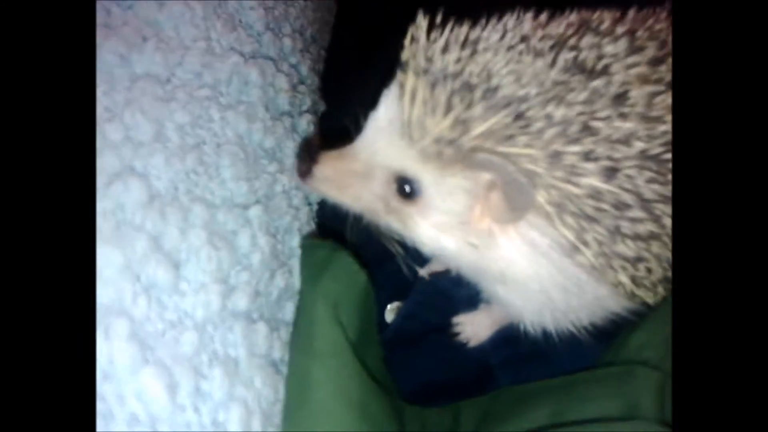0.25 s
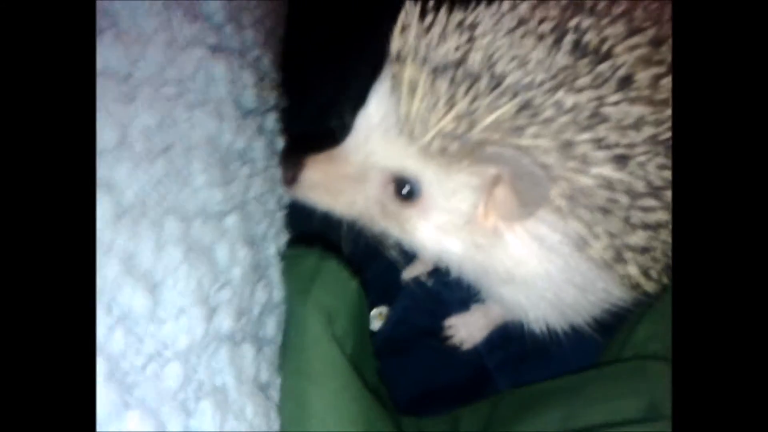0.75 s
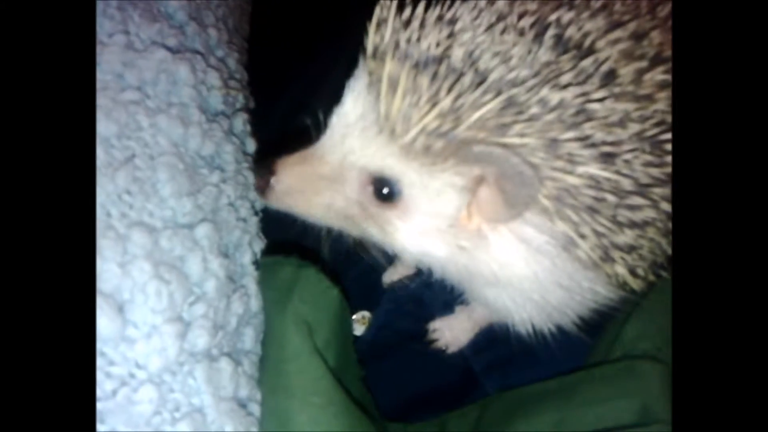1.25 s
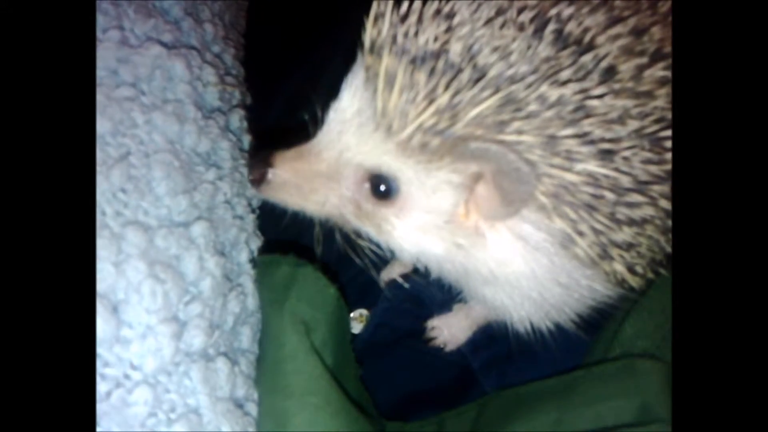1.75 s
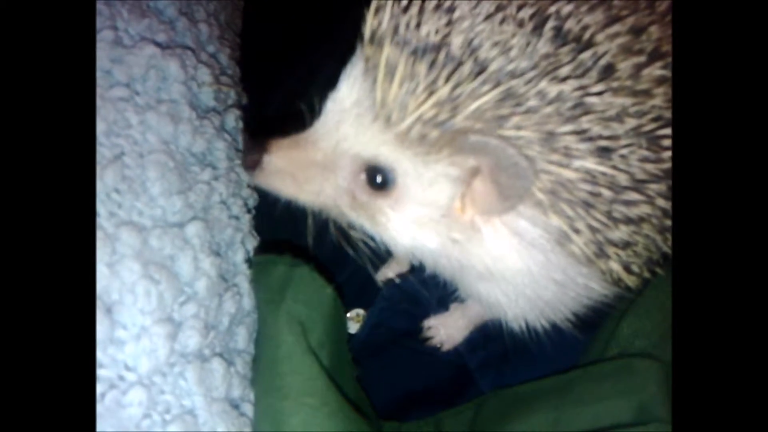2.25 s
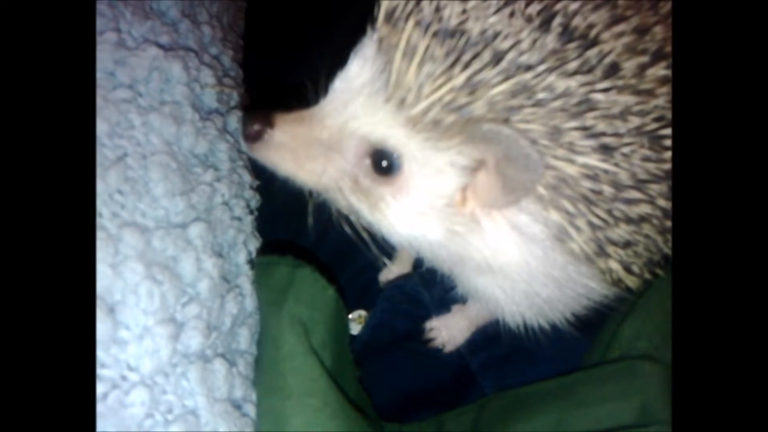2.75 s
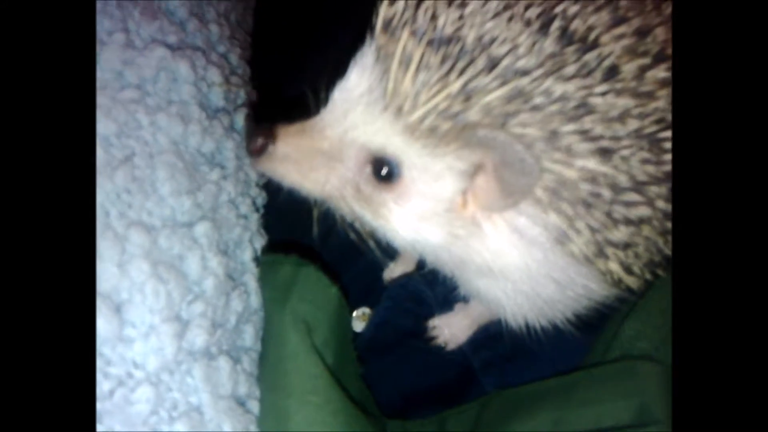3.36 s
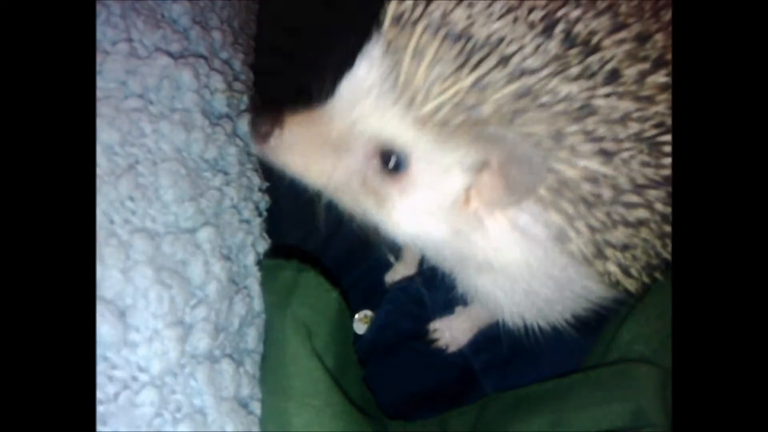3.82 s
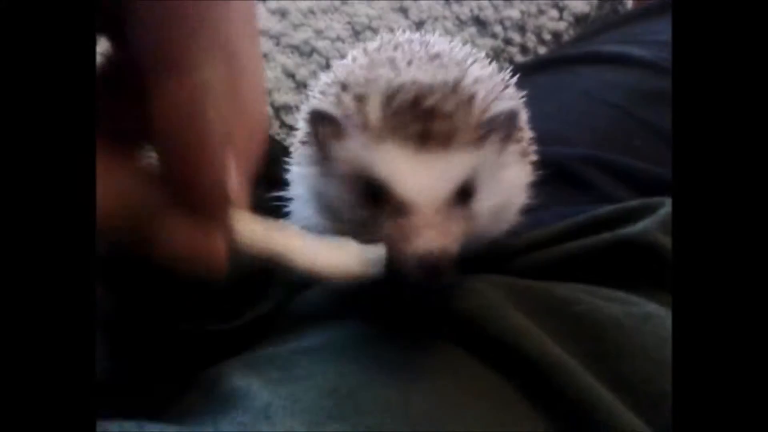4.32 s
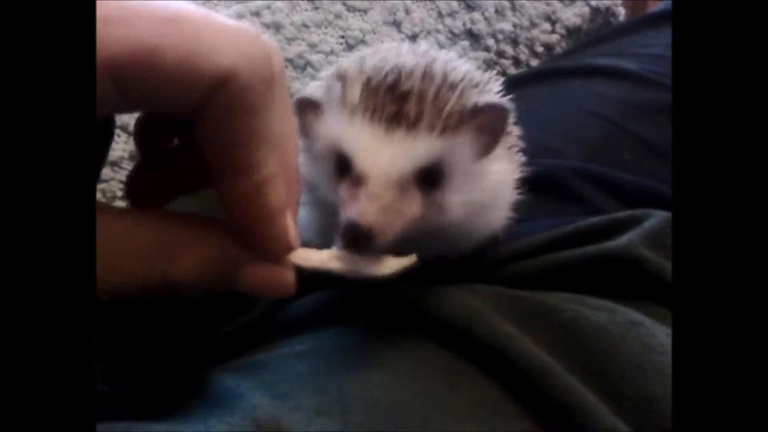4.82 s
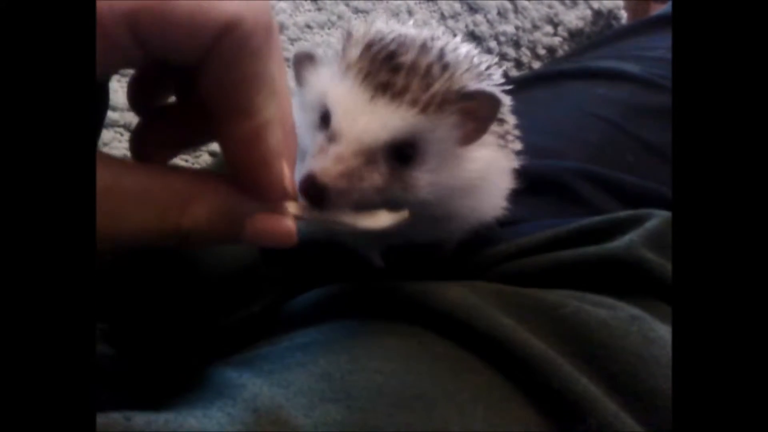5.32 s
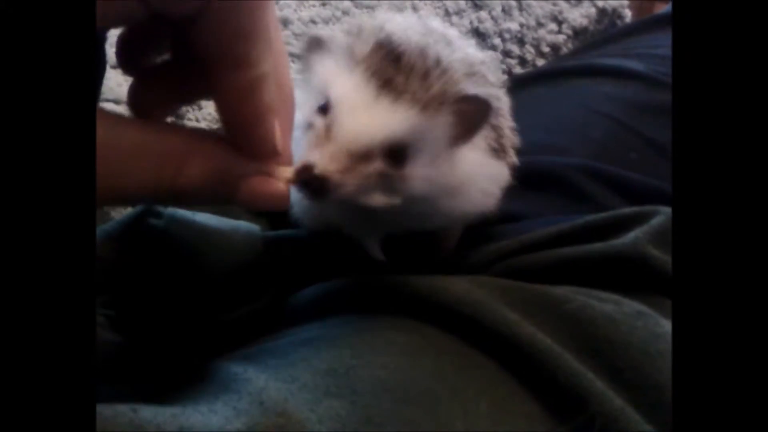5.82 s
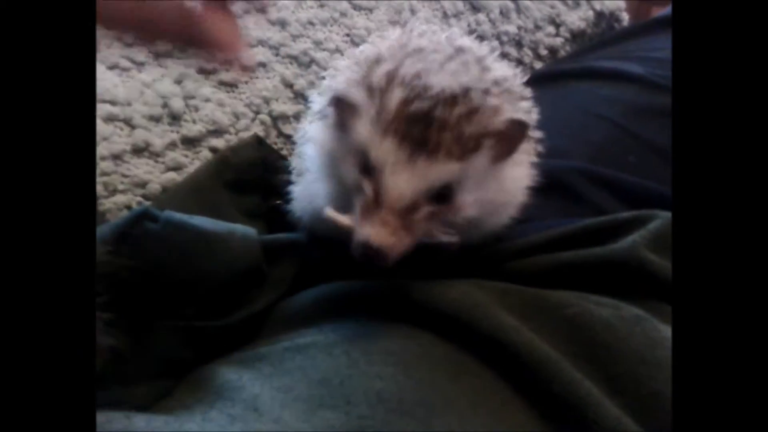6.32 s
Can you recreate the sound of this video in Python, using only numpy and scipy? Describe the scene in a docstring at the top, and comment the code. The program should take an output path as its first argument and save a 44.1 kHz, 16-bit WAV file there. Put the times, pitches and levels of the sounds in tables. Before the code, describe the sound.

In a quiet room, a hedgehog noses into soft fleece: a gentle rustle fades while sharp dry clicks cluster, space out and die away. After a near lull and a bump on the microphone, the sound moves abruptly closer. Quick airy sniffs and tiny wet mouth ticks follow, with another thump and low handling rumble. Steady hiss and two thin, very high whines lie beneath, rising slightly in the close part.

```python
"""Fleece rustles first, as a hedgehog on a lap noses into it; a run of dry clicks slows and fades.
Something bumps the recorder. Then, closer, the animal sniffs at a treat in quick puffs with tiny wet ticks.
A quiet room, recorder hiss and two thin electronic whines lie under it all.
Rustle, hiss, puffs and ticks are shaped noise; clicks are ringing modes; bumps and whines are built on sines."""
import sys
import numpy as np
from scipy import signal
from scipy.fft import rfft, irfft
from scipy.io import wavfile
from scipy.ndimage import uniform_filter1d

SR = 44100
rng = np.random.default_rng(int(sys.argv[2]) if len(sys.argv) > 2 else 0)


def put_to_file(sound):
    """Save the sound as 16-bit audio at rate SR, in the file named by the first command-line argument."""
    columns = np.atleast_2d(sound).T  # one column per channel
    safe = np.clip(columns, -1, 1)
    whole_steps = np.round(safe * 32767)
    wavfile.write(sys.argv[1], SR, whole_steps.astype(np.int16))


N = 290178  # length of the scene [samples]


def amp(db):
    """Turn decibels into a gain."""
    return 10 ** (np.asarray(db, float) / 20)


def rms_one(x):
    """Scale a sound so that its average strength (rms) is 1."""
    return x / np.sqrt(np.mean(x ** 2) + 1e-20)


def in_time(rows):
    """Draw each column of (time [s], ..) rows as a line with one value per sample."""
    times, *columns = np.transpose(rows)
    return [np.interp(np.arange(N) / SR, times, column) for column in columns]


def drift(rate_hz):
    """Slow random wandering of rms 1, made by smoothing noise twice."""
    # computed on every 40th sample, then joined by straight lines
    r = np.exp(-80 * np.pi * rate_hz / SR)
    white = rng.standard_normal(N // 40 + 2002)
    slow = signal.lfilter([1], [1, -2 * r, r * r], white)[2000:]
    return np.interp(np.arange(N) / 40, np.arange(len(slow)), rms_one(slow))


NOISE_EDGE_HZ = 15560  # coloured noise stops here


def colour(x, spectrum):
    """Shape noise by (frequency [Hz], level [dB]) rows, up to the noise edge."""
    hz, db = np.transpose(spectrum)
    grid = np.maximum(np.arange(N // 2 + 1) * SR / N, 1)
    gain = amp(np.interp(np.log(grid), np.log(hz), db))
    return irfft(rfft(x) * gain * (grid < NOISE_EDGE_HZ), N)


def resonate(x, peaks):
    """Send a sound through side-by-side resonances whose signs alternate."""
    out = 0
    for k, (hz, width, db) in enumerate(peaks):
        r = np.exp(-np.pi * width / SR)
        top = [(1 - r * r) / 2, 0, (r * r - 1) / 2]
        bottom = [1, -2 * r * np.cos(2 * np.pi * hz / SR), r * r]
        out = out + (-1) ** k * amp(db) * signal.lfilter(top, bottom, x + 1e-18)
    return out


def ring(strikes, hz, t60):
    """Each unit strike starts a sine that dies away by 60 dB in t60 seconds."""
    r, w = amp(-60 / (t60 * SR)), 2 * np.pi * hz / SR
    return signal.lfilter([0, np.sin(w)], [1, -2 * r * np.cos(w), r * r], strikes + 1e-18)


PORT_TURN_HZ = 4670  # above this the right port hears the wave upside down


def ports(left, low_db, high_db):
    """A near source on the left reaches the right port at other levels, its treble upside down."""
    low = signal.lfilter(*signal.butter(2, PORT_TURN_HZ, fs=SR), left)
    high = signal.lfilter(*signal.butter(2, PORT_TURN_HZ, "high", fs=SR), left)
    return np.array([left, amp(low_db) * low - amp(high_db) * high])


def wide(mid_spectrum, side_spectrum, side_db, lean, white):
    """Stereo noise: a middle part of rms 1 plus a side part; what they share leans it left."""
    lean = np.clip(lean, 0, 1)
    mid = rms_one(colour(white[0], mid_spectrum))
    shared = colour(white[0], side_spectrum) * lean
    own = colour(white[1], side_spectrum) * np.sqrt(1 - lean ** 2)
    return mid + amp(side_db) * rms_one(shared + own) * [[1], [-1]]


def swells(rows, hold_s, fall_db_per_s):
    """Gain of (time [s], level [dB], swell [s]) events: rise, hold, quick fall; powers add."""
    t, power = np.arange(N) / SR, 0
    for s, db, swell_s in rows:
        rise_db = 20 * np.maximum(s - hold_s / 2 - t, 0) / swell_s
        fall_db = fall_db_per_s * np.maximum(t - s - hold_s / 2, 0)
        power = power + amp(db - rise_db - fall_db) ** 2
    return np.sqrt(power)


STEP_S, STEP_FADE_S = 3.925, .02  # within 20 ms the sound steps: sniffs set in, hiss and whines step up


def step_up():
    """How far the step has gone (0-1), and the seconds since it began."""
    since = np.arange(N) / SR - STEP_S
    return np.clip(since / STEP_FADE_S, 0, 1), np.maximum(since, 0)


# how loud the fleece rustles: (time [s], level [dB])
RUSTLE_LEVEL = [(0.0, -51), (.08, -48), (.16, -48), (.21, -50), (0.45, -52.5), (.52, -55.5), (0.8, -57),
                (.95, -63), (1.156, -69), (2.008, -67.5), (2.666, -79), (2.9, -68), (3.804, -70),
                (3.92, -90)]
# brief strokes on the fleece: (time of the top [s], level [dB], swell for the last 20 dB [s])
FLEECE_STROKES = [(3.025, -55, .07), (3.11, -54, .02)]
STROKE_FALL_DB_PER_S = 400
# tone colour of the rustle, middle and side: (frequency [Hz], level [dB])
FLEECE_MID_COLOUR = [(150, -24), (300, -4), (500, -2), (700, -4.5), (1000, -11), (1500, -5.5), (2300, -.5),
                     (2700, -4.5), (3100, -1), (3800, -6), (5500, -9), (7000, -21), (9500, -13),
                     (15600, -10.5)]
FLEECE_SIDE_COLOUR = [(150, -40), (300, -9), (550, -1), (950, -12), (2300, -3), (3100, -1.5), (4000, -4),
                      (7000, -6.5), (15600, -13)]


def fleece():
    """Fibres catch and let go: dense grains of uneven size on soft noise."""
    sizes = amp(3.5 * np.minimum(rng.exponential(1, (2, N)), 3))
    caught = rng.random((2, N)) < 1500 / SR  # about 1500 grains per second
    grains = caught * sizes * rng.choice([-1, 1], (2, N))
    white = rng.standard_normal((2, N)) + .7 * rms_one(grains)
    rustle_db, = in_time(RUSTLE_LEVEL)
    level = np.hypot(amp(rustle_db), swells(FLEECE_STROKES, 0, STROKE_FALL_DB_PER_S))
    cloth = wide(FLEECE_MID_COLOUR, FLEECE_SIDE_COLOUR, side_db=-3.5, lean=0.7, white=white)
    return level * amp(2 + drift(24)) * cloth


# a band of thin hiss over the rustle: (time [s], level [dB])
SHEEN_LEVEL = [(0, -56.5), (.5, -62), (.78, -61), (.85, -92)]
# tone colour of that band: (frequency [Hz], level [dB])
SHEEN_COLOUR = [(7800, -30), (8500, 0), (9600, -6), (11500, -12), (14000, -30)]


def sheen():
    """Thin band of noise, out of phase between the sides and stronger on the right."""
    db, = in_time(SHEEN_LEVEL)
    band = rms_one(colour(rng.standard_normal(N), SHEEN_COLOUR))
    return amp(db) * band * [[amp(-5.0)], [-amp(7.0)]]


# low noise of handling: (time [s], level [dB])
HANDLING_LEVEL = [(0.0, -57), (0.1, -59), (.5, -57), (0.8, -59), (1.22, -57.5), (1.544, -61), (1.94, -61.5),
                  (2.6, -67), (2.938, -62), (3.3, -63), (3.49, -62), (3.562, -58), (3.7, -60), (4.27, -50),
                  (4.45, -62), (4.68, -56), (4.98, -61), (5.7, -61), (6.19, -62), (6.58, -57)]
# tone colour of the handling on the lap: (frequency [Hz], level [dB])
LAP_COLOUR = [(18, -49), (30, -6), (79, -0.5), (146, 3.5), (305, -8), (532, -12), (579, -13), (900, -24),
              (1170, -65), (1980, -120)]


def handling():
    """Low noise in wavering lumps as the recorder shifts on the lap."""
    level_db, = in_time(HANDLING_LEVEL)
    lumps = amp(level_db + 3.2 * drift(11.3))
    white = rng.standard_normal((2, N))
    return lumps * wide(LAP_COLOUR, LAP_COLOUR, side_db=-10, lean=0.2, white=white)


# tone colour of room and recorder hiss, middle and side: (frequency [Hz], level [dB])
HISS_MID_COLOUR = [(18, -44), (30, -18), (120, -6.5), (200, -3), (330, -17), (660, -18), (1500, -18),
                   (2300, -17.5), (3300, -13.5), (5000, -13), (6500, -21.5), (8000, -33), (10500, -13),
                   (15600, -12.5)]
HISS_SIDE_COLOUR = [(18, -55), (30, -16), (200, -12.5), (380, -18), (900, -23.5), (2000, -27),
                    (3000, -18.5), (4900, -15), (7500, -17), (10000, -13), (12500, -8.5), (15600, -12.5)]
# starting level, step up at 3.925 s, slow sag after it, pull to the left (0-1)
HISS_DB, HISS_STEP_DB, HISS_SAG_DB_PER_S, HISS_LEAN = -57.3, 3.2, 1.1, .06


def hiss():
    """Room tone and recorder noise; its treble is mostly out of phase between the channels."""
    moved, since = step_up()
    db = HISS_DB + HISS_STEP_DB * moved - HISS_SAG_DB_PER_S * since + 0.84 * drift(10.6)
    white = rng.standard_normal((2, N))
    return amp(db) * wide(HISS_MID_COLOUR, HISS_SIDE_COLOUR, side_db=7, lean=HISS_LEAN, white=white)


# thin electronic tones: (frequency [Hz], level [dB], step at 3.925 s [dB], sag after it [dB per s])
WHINE_TONES = [(11043, -55.5, 6, .1), (12752.5, -56, 5.5, .7)]
WHINE_LEFT_DB, WHINE_LEFT_STEP_DB = 3.7, 2.4  # how much louder the left is, and its increase at the step


def whines():
    """Two high sines of fixed pitch and gently wavering level, the sides in nearly opposite phase."""
    (moved, since), out = step_up(), 0
    right = amp(-WHINE_LEFT_DB - WHINE_LEFT_STEP_DB * moved)
    for hz, db, step_db, sag in WHINE_TONES:
        turn = 2 * np.pi * hz * np.arange(N) / SR
        level = np.sqrt(2) * amp(db + step_db * moved - sag * since + 1.3 * drift(3))
        out = out + level * np.array([np.sin(turn), right * np.sin(turn - 2.55)])
    return out


# soft shifts of the recorder: (time of the top [s], level [dB], pitch [Hz], length [s])
SOFT_THUDS = [(0.078, -45.5, 85, 0.032), (0.438, -58, 120, .04), (2.164, -63, 75, 0.065),
              (2.787, -61.5, 300, 0.06), (3.512, -49, 250, .025), (3.527, -46, 200, .025),
              (3.557, -44, 200, .03), (3.582, -50, 220, .025), (3.69, -48, 130, .05),
              (4.003, -47, 85, 0.073), (4.017, -50, 110, 0.043), (4.16, -54, 130, .05),
              (5.16, -57, 150, 0.063), (6.511, -48, 100, 0.031), (6.549, -41, 95, 0.022)]


def thuds():
    """A few uneven swings of the case, two sines each, under a soft swell."""
    out, t = np.zeros(N), np.arange(N) / SR
    turns = rng.uniform(0, 2 * np.pi, (len(SOFT_THUDS), 2))
    for (s, db, hz, length), (a, b) in zip(SOFT_THUDS, turns):
        swell = np.exp(-.5 * ((t - s) / (0.26 * length)) ** 2)
        swing = np.sin(2 * np.pi * hz * t + a) + .5 * np.sin(2 * np.pi * 1.6 * hz * t + b)
        out += amp(db + 2.5) * swell * swing
    return out * amp([[.6], [-.6]])


# dry clicks: (time [s], level [dB], low knock re level [dB], bright edge re level [dB])
DRY_CLICKS = [(0.153, -45, -4, 10), (0.1637, -41, -14, -3), (0.287, -45, -11, 2), (0.3321, -45, -6, -1),
              (0.376, -47, -4, 7.5), (0.4175, -46, 2, 2), (0.4326, -47, 4, 8.5), (0.4708, -44, -2, -12),
              (0.7692, -46, -11, -7), (0.7815, -50, 3, -3), (0.8095, -47, -6, -3), (0.8204, -46, -14, 4),
              (0.8272, -21, -12.5, -6), (0.9061, -20, -12, -4), (0.9198, -27.5, -8.5, -10),
              (0.9455, -46, -8, -1), (0.976, -51, -8.5, -10), (1.029, -43.5, -13, 3),
              (1.0503, -21, -9.5, 2.5), (1.055, -37, -8, 1), (1.0971, -25, -8.5, 2.5), (1.1028, -38, -6, 2),
              (1.186, -48, 2, -6), (1.1917, -22.5, -7.5, 1), (1.1988, -42, 0, 8), (1.3348, -26.5, -6, -2.5),
              (1.478, -48, -5, 7), (1.5024, -30, -9.5, -4), (1.705, -37, 1, -3), (1.723, -42, -6, -3),
              (1.9072, -51, -3, 2), (1.9284, -40.5, 2, 4), (2.0573, -49.5, -3, 0), (2.1222, -54, 6, 1),
              (2.1523, -51.5, 3, 2), (2.3504, -51, 2, 0), (2.9604, -53, -17, -3), (3.003, -52, 4, -6),
              (3.1085, -54.5, 3, 3.5), (3.184, -56, 6, 0), (3.327, -58, 9, -6), (4.226, -44, -2, 0)]
# what a click rings with: (frequency [Hz], level [dB], t60 [s], part [0 knock, 1 body, 2 edge])
CLICK_RINGS = [(147, -8.5, 0.032, 0), (303, -6, 0.027, 0), (555, -0.5, 0.018, 0), (740, -1.5, 0.0049, 1),
               (1450, 0, 0.0075, 1), (2280, 0, 0.006, 1), (3080, -2.5, 0.0071, 2), (3800, -4.5, 0.006, 2),
               (4180, -4.5, 0.0056, 2), (5000, -8.5, 0.0045, 2), (5710, -8, 0.003, 2)]
CLICK_SPREAD_DB = 1.3  # random unevenness of every strike


def clicks():
    """Each click is a few slips within 2 ms and a weak echo, striking every mode; the room answers faintly."""
    rows, out = np.array(DRY_CLICKS), np.zeros(N)
    slips = [(.0003, 2), (.0009, 11), (.0021, -2.5), (.0055, -13)]  # (lag [s], level [dB])
    chance = rng.normal(0, CLICK_SPREAD_DB, (len(rows), len(CLICK_RINGS), len(slips)))
    part_db = [rows[:, 2], 0 * rows[:, 2], rows[:, 3]]
    for k, (hz, db, t60, part) in enumerate(CLICK_RINGS):
        strikes = np.zeros(N)
        for j, (lag, slip_db) in enumerate(slips):
            at = ((rows[:, 0] + lag) * SR).astype(int)
            strikes[at] += amp(rows[:, 1] + part_db[round(part)] + db + slip_db + chance[:, k, j])
        out += (-1) ** k * ring(strikes, hz, t60)
    band = signal.butter(2, [90, 6800], "band", fs=SR, output="sos")
    out = signal.sosfilt(band, amp(-4) * out)
    # the room's answer: fading noise that starts after 4 ms
    t = np.arange(round(.1 * SR)) / SR
    tail = amp(-40.5 - 60 * t / 0.083) * rng.standard_normal((2, len(t))) * (t > .004)
    room = signal.fftconvolve(out[None], tail, axes=1)[:, :N]
    return ports(out, low_db=-7.5, high_db=-9) + room


# bumps on the recorder: (time [s], kick [dB], kick time [s], swing [dB], swing pitch [Hz], swing lag [s],
#                         crack [dB], squeak [dB], squeak lag [s], squeak length [s])
RECORDER_BUMPS = [(3.2263, -19.5, .0021, -32, 92, 0, -30, -32, .0045, .0068),
                  (4.2968, -19, .002, -30, 88, 0, -26, -32, .0058, .008),
                  (4.6958, -33, .005, -32, 80, .004, -60, -60, .005, .007)]
SQUEAK_HZ, SQUEAK_UNDER_HZ = 3680, 3050  # main tone and a weaker one below


def bumps():
    """A quick kick and slower swing of the case, a crack at the contact, a brief squeak as it lets go."""
    low, near, t = np.zeros(N), np.zeros(N), np.arange(round(.06 * SR)) / SR
    grit = rng.standard_normal((len(RECORDER_BUMPS), len(t)))
    for row, noise in zip(RECORDER_BUMPS, grit):
        s, kick_db, kick_s, swing_db, hz, lag, crack_db, squeak_db, after_s, squeak_s = row
        span = slice(round(s * SR), round(s * SR) + len(t))
        late = np.maximum(t - lag, 0)
        kick = np.sin(2 * np.pi * (1 - np.exp(-(t / kick_s) ** 1.8))) * np.exp(-t / (3 * kick_s))
        low[span] -= amp(kick_db) * kick
        low[span] += amp(swing_db) * np.sin(2 * np.pi * hz * late) * np.exp(-late / .013)
        crack = resonate(noise * np.exp(-t / 0.0018), [(1500, 2200, 7), (4300, 2000, 4)])
        near[span] += amp(crack_db) * crack
        squeak_shape = np.sqrt(np.sin(np.pi * np.clip((t - after_s) / squeak_s, 0, 1)))
        pair = np.sin(2 * np.pi * SQUEAK_HZ * t) + 0.37 * np.sin(2 * np.pi * SQUEAK_UNDER_HZ * t)
        rough = 1 + 0.68 * uniform_filter1d(noise, size=12)
        near[span] += amp(squeak_db) * squeak_shape * pair * rough
    low = signal.lfilter(*signal.butter(1, 40, "high", fs=SR), low)
    return low * amp([[2], [-2]]) + ports(near, low_db=-8, high_db=-10)


# ticks: wet ones of nose and mouth, and sharp ones in the bumps at 3.2265 and 4.2972 s: # (time of the top [s],
# level [dB], length [s], share of the lower ring [0-1], lean to the right port [dB])
TICK_EVENTS = [(3.2265, -25, .0004, 0, 14), (4.2608, -20, .001, 1, -6), (4.2972, -26, .0006, .25, 12),
               (4.323, -29, .001, 0, 0), (4.567, -27, .0014, 0, -3), (4.595, -26, .0014, 0, 0),
               (5.0444, -30, .001, 0, 0), (5.151, -31, .0012, 0, 0), (5.168, -35, .002, 1, 0),
               (5.215, -39, .001, 1, 0), (5.9093, -23, .001, .15, -2), (5.988, -39, .001, 1, 0),
               (6.1012, -26, .0018, .2, -2), (6.1262, -21, .0014, .1, -1), (6.178, -37, .001, 1, 0),
               (6.222, -36, .001, .3, 0), (6.396, -38, .001, 1, 0), (6.495, -34, .001, 1, 0),
               (6.522, -24, .0014, 0, -1)]
# resonances of the high and the lower ring: (frequency [Hz], width [Hz], level [dB])
TICK_HIGH_RING = [(5000, 2500, -14), (9200, 2000, -5), (11000, 2500, -2), (14500, 2500, 1)]
TICK_LOW_RING = [(4670, 1400, 4), (6970, 2200, -7), (12000, 4000, -10)]


def ticks():
    """Nose and mouth tick wetly, and the bumps tick sharply: millisecond bursts of bright noise, quick to rise
    and slower to fall."""
    left, lean, t = np.zeros(N), np.ones((2, N)), np.arange(-200, 300) / SR
    high, low = (resonate(rng.standard_normal(N), peaks) for peaks in (TICK_HIGH_RING, TICK_LOW_RING))
    for s, db, length, lower, right_db in TICK_EVENTS:
        span = slice(round(s * SR) - 200, round(s * SR) + 300)
        burst = np.exp(-np.where(t < 0, -t / .35, t / .8) / length)
        burst_rms = np.sqrt(np.mean(burst ** 2))
        for share, noise in ((1 - lower, high[span]), (lower, low[span])):
            left[span] += amp(db - 2) * share * rms_one(burst * noise) * burst_rms
        lean[1, span] = amp(right_db)
    return lean * ports(left, low_db=-10, high_db=-9)


# sniffs: (time of the top [s], airflow [dB], swell for the last 20 dB [s],
#          upper nasal ring [dB], nostril hiss [dB])
SNIFF_PUFFS = [(3.948, -46, .022, 0, 0), (3.974, -42.5, .06, 0, 0), (4.008, -52, .03, -4, 0),
               (4.085, -53, .08, 0, 0), (4.155, -42.5, .055, 0, 0), (4.255, -45.5, .09, 0, 0),
               (4.37, -49, .07, 0, 0), (4.585, -45.5, .055, -1, 2), (4.69, -43, .09, -1, 0),
               (4.775, -55, .12, 0, 2), (4.83, -57, .1, 0, 0), (4.925, -56, .05, 1, 0),
               (5.04, -57, .03, 3, 0), (5.166, -52, .04, 3, 0), (5.218, -57, .03, 3, 0),
               (5.262, -55, .04, 2, 0), (5.295, -57, .05, 0, 0), (5.37, -59, .06, 0, 0),
               (5.46, -60, .06, 0, 0), (5.53, -58, .1, 0, 0), (5.597, -55.5, .03, 0, 0),
               (5.64, -58, .06, 0, 0), (5.755, -60, .05, 0, 0), (5.80, -59, .05, 0, 0),
               (5.915, -57, .05, 1, 0), (5.985, -57, .08, 0, 0), (6.075, -58, .05, 0, 0),
               (6.175, -56, .06, 1, 0), (6.235, -51, .05, 0, 0), (6.29, -55, .08, 0, 0),
               (6.335, -56, .08, 0, 0), (6.41, -57, .1, 0, 0), (6.46, -53.5, .08, 0, 0),
               (6.52, -45, .07, -1, 0), (6.548, -42, .04, -1, 0)]
PUFF_HOLD_S, PUFF_FALL_DB_PER_S = .022, 650
# steady air between sniffs: (time [s], level [dB])
STEADY_AIR = [(3.93, -58), (4.35, -58), (4.5, -66), (5.9, -68), (6.3, -60), (6.58, -54)]
# nasal resonances, then the hiss at the nostrils: (frequency [Hz], width [Hz], level [dB])
NOSE_RINGS = [(2800, 700, .2), (4330, 1000, 0.5), (1600, 1500, -8.5), (3500, 900, -6.5)]
NOSTRIL_HISS = [(6460, 1400, -11.5), (9800, 1100, 2), (14000, 7500, -1.5)]
NOSE_PATCHY_DB, FLUTTER_DB = 1.6, 2.5  # each nasal ring wavers alone; all the air flutters together


def sniffs():
    """Turbulent air flutters through steep-sided nasal resonances; each sniff has its own colour."""
    steady_db, = in_time(STEADY_AIR)
    s, db, swell_s, upper_db, hiss_db = np.transpose(SNIFF_PUFFS)
    flows = []
    for more_db in (0, upper_db, hiss_db):
        puffs = swells(zip(s, db + more_db, swell_s), PUFF_HOLD_S, PUFF_FALL_DB_PER_S)
        flows.append(np.hypot(puffs, amp(steady_db)))
    lower, upper, top = flows
    air = rng.standard_normal((5, N)) * step_up()[0] * amp(FLUTTER_DB * drift(140))
    nose = 0
    for peak, flow, noise in zip(NOSE_RINGS, (lower, upper, lower, lower), air):
        patchy = noise * flow * amp(NOSE_PATCHY_DB * drift(30))
        nose = nose + resonate(resonate(patchy, [peak]), [peak])  # twice, for steep sides
    # a flat lift of 7 dB that also ends at the noise edge
    nostrils = colour(resonate(air[-1] * top, NOSTRIL_HISS), [(20, 7), (20000, 7)])
    return ports(nose * amp(14.5) + nostrils, low_db=-8.5, high_db=-37)


# a faint breathy whistle: (time [s], pitch [Hz], level [dB])
WHISTLE_PATH = [(4.55, 1400, -85), (4.62, 1410, -69), (4.8, 1440, -67), (4.92, 1470, -69),
                (4.97, 1480, -73), (5.15, 1490, -72), (5.2, 1490, -90)]


def whistle():
    """Narrow noise around a wavering, slowly rising pitch."""
    hz, db = in_time(WHISTLE_PATH)
    turn = 2 * np.pi * np.cumsum(hz + 24 * drift(15)) / SR
    tone = (.8 + .6 * drift(40)) * np.sin(turn) + .6 * drift(40) * np.cos(turn)
    return ports(amp(db + 2 * drift(15)) * tone, low_db=-3, high_db=-3)


def scene():
    """Add all sources at the two ports."""
    cloth = fleece() + sheen() + handling()
    background = hiss() + whines()
    knocks = thuds() + clicks() + bumps()
    nose_and_mouth = ticks() + sniffs() + whistle()
    return cloth + background + knocks + nose_and_mouth


# where the bass rolls off; the left port hears less deep bass: (left [Hz], right [Hz])
PORT_BASS_CUT = [55, 15]
CUTOFF_HZ = 16694  # from here up the treble is cut by 70 dB


def record(dry):
    """Each port rolls off its bass; the top is cut steeply."""
    ported = [signal.lfilter(*signal.butter(1, hz, "high", fs=SR), side)
              for hz, side in zip(PORT_BASS_CUT, dry)]
    return signal.sosfilt(signal.cheby2(12, 70, CUTOFF_HZ, fs=SR, output="sos"), ported)


dry = scene()
out = record(dry)
put_to_file(out)
```